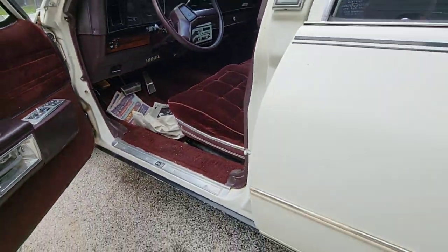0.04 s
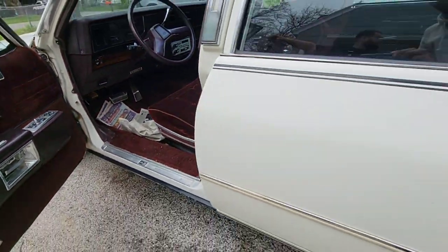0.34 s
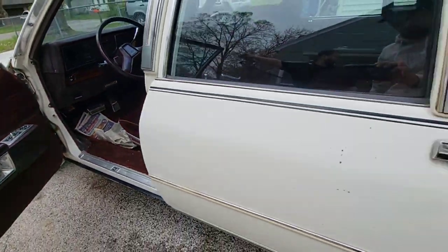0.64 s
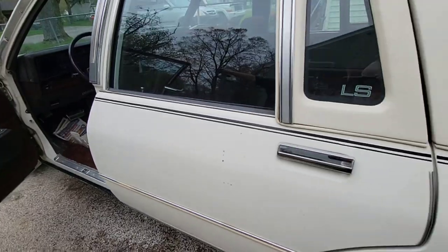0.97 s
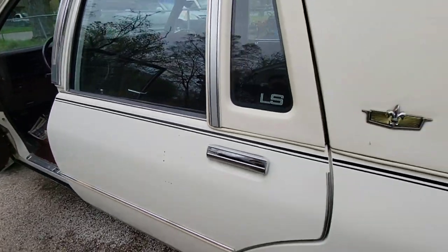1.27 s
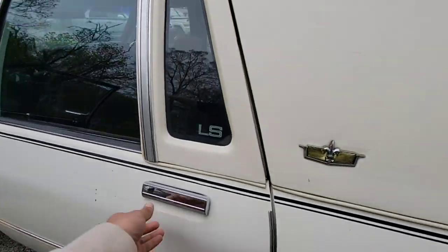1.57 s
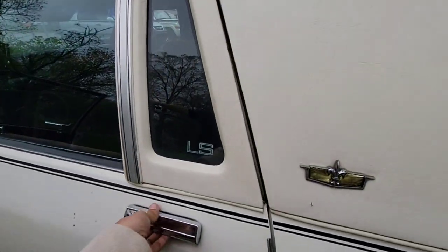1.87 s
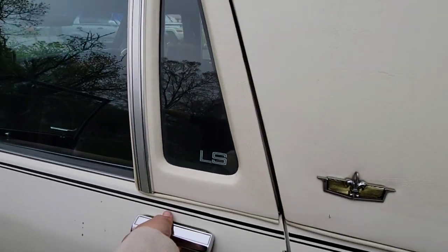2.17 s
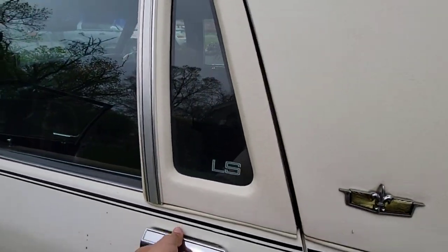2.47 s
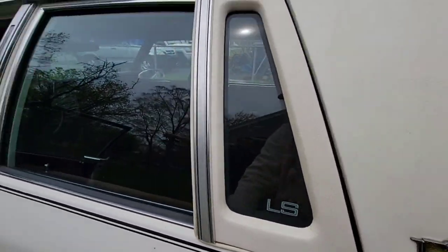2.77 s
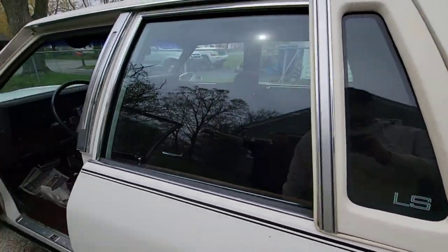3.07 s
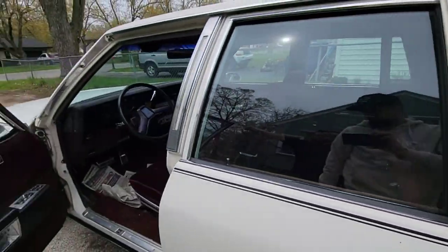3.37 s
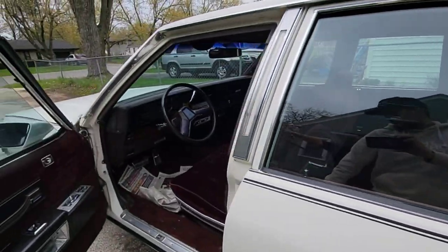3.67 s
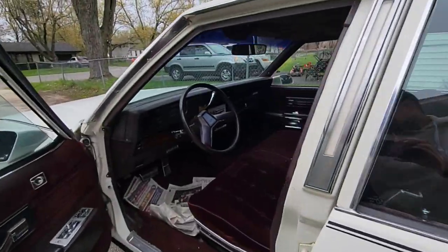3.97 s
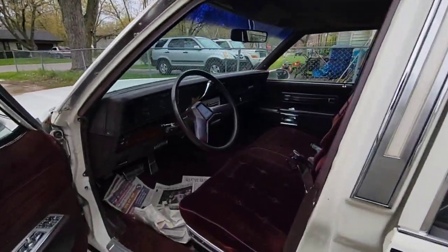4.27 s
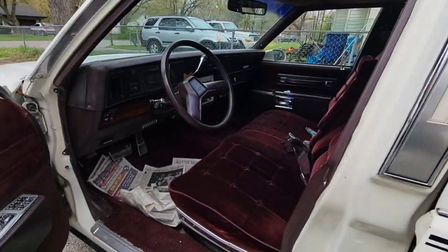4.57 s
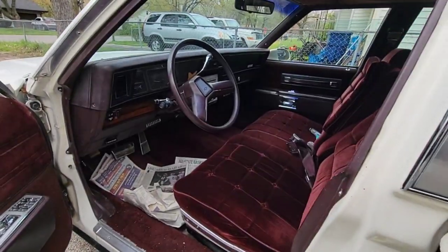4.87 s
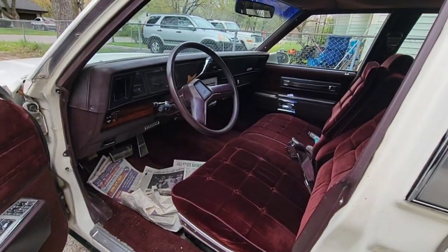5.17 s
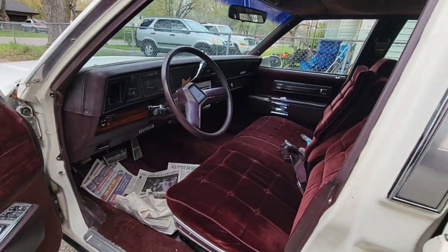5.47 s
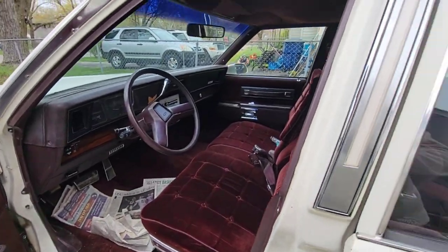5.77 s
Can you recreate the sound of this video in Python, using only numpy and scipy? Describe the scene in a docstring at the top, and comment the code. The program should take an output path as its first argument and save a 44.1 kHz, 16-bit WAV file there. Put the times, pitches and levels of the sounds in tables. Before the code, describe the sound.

Two large dogs bark outdoors, one near and one farther off, while a car door handle clacks over light wind rumble.

```python
"""Two large dogs in a yard; houses echo, light wind rumbles on the two ports of a hand-held microphone.
Thin whistles, then at 0.5 s the near dog's vocal folds break from a clean yip into a hoarse roar; the far
dog answers twice, gruffly. Someone steps along a parked car, pulls its rear door handle at 2 s and lets it
snap back at 2.7 s. The far dog barks twice more, the near one three times from 3.5 s and once at 5.2 s.
Whistles, steps and low bumps on the microphone end the scene."""
import sys
import numpy as np
from scipy import signal
from scipy.fft import rfft, irfft, next_fast_len
from scipy.io import wavfile
from scipy.ndimage import uniform_filter1d, minimum_filter1d, map_coordinates

SR = 44100
rng = np.random.default_rng(int(sys.argv[2]) if len(sys.argv) > 2 else 0)


def store_wav(level_fs):
    """Save 16-bit WAV to argv[1]."""
    pcm = np.round(np.clip(np.atleast_2d(level_fs), -1, 1) * 32767)
    wavfile.write(sys.argv[1], SR, pcm.T.astype(np.int16))


N = 265923

# neighbourhood hush: time_s, level_db
HUSH_LEVELS = [(0, -57.5), (2.4, -58), (3.5, -51), (4.7, -62), (6.03, -54)]
# wind puffs: peak_s, half_width_s, level_db
GUSTS = [(.1, 0.15, -37), (.64, 0.48, -42.5), (1.26, 0.1, -34.5), (3.73, .05, -41.5), (4.6, 0.56, -42.5),
         (5.48, 0.18, -34), (5.92, 0.27, -36.5)]
# microphone bumps: start_s, length_s, level_db, pitch_hz
BUMPS = [(5.368, 0.051, -28, 68.5), (5.467, 0.079, -25.5, 89), (5.842, 0.04, -24.5, 64.3),
         (5.865, 0.063, -34, 206)]
# thin whistles, probably birds: start_s, length_s, level_db, start_hz, middle_hz, end_hz, overtone_db
WHISTLES = [(0, 0.054, -58, 2800, 2895, 2830, -15), (0.057, 0.044, -46, 3000, 2997, 3000, -29),
            (0.081, 0.077, -58, 2930, 2970, 2880, -6.5), (0.282, 0.061, -80, 4900, 4150, 3560, -30),
            (4.927, .034, -65.5, 4640, 5210, 5250, -28), (5.43, 0.16, -60, 2860, 2930, 3040, -26),
            (5.577, 0.13, -67, 3040, 2960, 3000, -29), (5.691, 0.12, -55.5, 1148, 1105, 1140, -23)]
# sleeve swishes: peak_s, half_width_s, level_db
SWISHES = [(.05, 0.42, -56), (1.6, 0.23, -52.5), (2.12, .16, -51), (2.67, 0.083, -44), (3.24, 0.31, -49),
           (5.8, 0.054, -51), (6, 0.16, -57)]
# shoes on gritty paving: start_s, scuff_db, grit_db
STEPS = [(.135, -28.5, -56), (.837, -33, -49), (1.568, -23, -51), (1.706, -44, -59.5), (1.8253, -37, -44),
         (1.892, -41, -55.5), (3.14, -32.5, -49), (3.214, -38.5, -41.5), (3.9357, -36, -42.5),
         (4.4752, -36.5, -54), (4.819, -45.5, -52.5), (5.731, -38, -67), (5.8014, -59, -52.5),
         (5.8326, -35.5, -51)]
# hollow ring partials: freq_hz, gain_db
RING_PARTIALS = [(1055, -59.5), (1787, -61), (2492, -62), (2982, -67.5)]
# small metal contacts: start_s, level_db
JINGLES = [(0.9332, -49), (3.2745, -48.5), (3.3764, -54), (3.3917, -46.5)]
# their modes: freq_hz, gain_db, t60_s
JINGLE_MODES = [(10230, -2, 0.053), (12200, -7.5, .06), (14900, 2, .09), (15320, -1.5, .1)]
# pivot squeaks: start_s, length_s, level_db, centre_hz
SQUEAKS = [(2.007, 0.027, -53.5, 3870), (2.038, 0.047, -50, 6720)]
# handle linkage catches: start_s, thud_db, clack_db, snap_db, t60_s
CATCHES = [(1.937, -38, -37, -43.5, 0.18), (1.964, -43.5, -23.5, -27, 0.071), (2.033, -43, -47, -62, 0.54),
           (2.101, -38, -28.5, -45, 0.081), (2.599, -45.5, -44.5, -54, 0.73),
           (2.63, -42.5, -53.5, -48.5, 1), (2.679, -38, -17, -19.5, 0.08), (2.751, -34, -32, -57, 0.21),
           (2.765, -67, -38.5, -54, .1)]
# modes of door skin, steel latch, open car cabin: freq_hz, width_hz, gain_db
PANEL_MODES = [(206, 120, -12.5), (325, 49, 1), (369, 44, 1), (596, 110, -7.5)]
LATCH_MODES = [(1270, 43, 14), (1795, 62, 5), (2470, 32, -1), (3590, 64, 5.5)]
CABIN_MODES = [(400, 7.6, -24.5), (485, 21, 13.5), (770, 16, -12), (930, 75, 4.5), (1160, 6.1, 8),
               (1370, 14, 6.5), (2770, 120, 6)]
# barks: start_s, length_s, level_db, top_pitch_hz, crest_share, throat_scale, muzzle_hz, gape_db, woof_db
FAR_BARKS = [(.935, 0.19, -25, 427.7, 0.44, 1.07, 1900, 0, -15),
             (1.255, 0.21, -25.5, 387, 0.51, 1.1, 1050, -5, 0.5),
             (2.815, .18, -24.5, 421.4, .5, 1.15, 1250, -3.5, -9.5),
             (3.2, .165, -25.5, 409.5, 0.53, .99, 1250, 3, -9)]
NEAR_BARKS = [(.479, 0.091, -7, 499.6, 0.74, 0.99, 1798, -2.5, 1),
              (3.536, 0.073, -8, 451.2, .6, 1.013, 1760, -3.5, -2),
              (3.764, .088, -8.5, 422.6, 0.37, 1.036, 1220, -4.5, -6),
              (4.062, .08, -11, 489.4, .68, .96, 1295, -1, -1),
              (5.230, 0.093, -10.5, 419.3, 0.34, 1.01, 1274, 0.5, -1)]
# throat and muzzle resonances: freq_hz, gain_db
FAR_THROAT = [(200, -37), (340, -0.5), (450, 7), (600, -1.5), (760, 6.5), (1000, -4.5), (1260, 2),
              (1550, -26), (1950, -7.5), (2600, -47.5), (4200, -61.5), (5700, -63.5), (9000, -72.5)]
NEAR_THROAT = [(210, -75.5), (350, -5), (490, -0.5), (640, -7), (830, 6.5), (1050, -6), (1320, -7),
               (1760, -10), (2400, -28.5), (2950, -32.5), (4000, -44), (5400, -32.5), (7200, -45.5),
               (9000, -65)]
# yips, led by harmonic 3: start_s, length_s, lead_db, peak_db, start_hz, end_hz, others_db
YIPS = [(0.45, 0.039, -28, -18, 1262, 1415, -14), (3.484, 0.053, -24.5, -4, 1394, 1491, -16),
        (3.737, 0.039, -22.5, -11, 1294, 1535, -22.5), (4.026, .052, -21.5, -7, 1305, 1350, -23.5),
        (5.202, 0.033, -14, -33.5, 1466, 1410, -15.5)]
# other yip harmonics: number, gain_db
YIP_HARMONICS = [(1, -30.5), (2, -15), (4, -25), (5, -25), (6, -28.5), (7, -37.5)]
# noise spectra: freq_hz, gain_db
RUMBLE = [(12, -44.5), (20, -11), (54, -5), (75, -0.5), (98, -7.5), (124, -13.5), (274, -29), (300, -52.5),
          (390, -59.5), (660, -120)]
HUSH = [(88, -42.5), (150, -3.5), (182, -7), (366, -5), (428, -17.5), (500, -7.5), (572, -20.5), (812, -11),
        (1170, -24), (1320, -57.5), (2500, -25), (5130, -44), (15500, -53)]
CLACK = [(300, -9.5), (900, 2), (1400, 3.5), (2600, -5), (4500, -19.5), (9000, -59)]
SNAP = [(1500, -38), (3800, 4.5), (7000, -0.5), (9000, -6), (15000, -31.5)]
CLOTH = [(200, 2.5), (700, 3.5), (1800, 1.5), (3000, -9.5), (4500, -13.5), (7000, -20.5), (9000, -33),
         (15000, -26)]
TEETH_HISS = [(1800, -13), (2900, 2), (4000, -11), (5400, 3), (7200, -.5), (9000, -20.5), (15000, -20)]
YIP_AIR = [(600, -30.5), (1000, 7.5), (1500, -.5), (2500, -4.5), (4000, -29.5), (5600, -6), (9000, -37.5)]
# decay off close walls and farther houses: freq_hz, t60_s
WALL_DECAY = [(200, 0.22), (800, 0.35), (2000, 0.18), (6000, 0.24), (14000, 0.14)]
STREET_DECAY = [(200, 2.1), (450, 0.34), (820, 1.44), (1500, 0.98), (5000, 2), (12000, 0.73)]
# port phase for sound from the side: freq_hz, left_lead_rad
PORT_PHASE = [(100, 0), (420, -1.8), (850, -3.0), (1400, -3.4), (2600, -3.0), (6000, -4.4)]
# dogs' direction as the microphone turns: time_s, phase_scale
BEARING = [(0, 1.02), (3.2, 1.02), (3.5, 1.12), (3.75, 1.02), (4.05, .82), (5.2, .77)]
# reflections off the car: freq_hz, random_phase_rad
SCATTER = [(900, 0.029), (1700, 1.5), (2600, 3.3), (5000, 3.4)]


def amp(db):
    """Decibels to gain."""
    return 10 ** (np.asarray(db) / 20)


def unit(x):
    """Scale to rms 1."""
    return x / np.sqrt(np.mean(x ** 2) + 1e-20)


def along(points, hz):
    """(freq_hz, value) points read on a log axis."""
    freqs_hz, values = np.transpose(points)
    return np.interp(np.log(hz + 1), np.log(freqs_hz), values)


def clock(length_s):
    """Sample times in seconds."""
    return np.arange(int(length_s * SR)) / SR


def phase_of(pitch_hz):
    """Running phase in radians."""
    return 2 * np.pi * np.cumsum(pitch_hz) / SR


def wobble(knots_per_s, size):
    """Smooth random curve."""
    return map_coordinates(rng.standard_normal(4096), [np.arange(size) * knots_per_s / SR], mode="wrap")


def swells(rows, rest_db):
    """Resting gain plus one bell per row."""
    t = np.arange(N) / SR
    power = sum(amp(db) ** 2 * np.exp(-2 * ((t - peak_s) / width_s) ** 2) for peak_s, width_s, db in rows)
    return np.sqrt(amp(rest_db) ** 2 + power)


def filtered(x, response):
    """Apply a complex frequency response."""
    size = x.shape[-1]
    padded = next_fast_len(size + 8192)
    return irfft(rfft(x, padded) * response(np.fft.rfftfreq(padded, 1 / SR)), padded)[..., :size]


def coloured(x, spectrum, freq_scale=1):
    """Shape by a spectrum, at rms 1."""
    return unit(filtered(x, lambda hz: amp(along(spectrum, hz / freq_scale))))


def resonate(x, modes):
    """Parallel resonators of alternating sign."""
    return filtered(x, lambda f: sum(
        (-1) ** k * amp(db) * 1j * f * width_hz / (hz * hz - f * f + 1j * f * width_hz)
        for k, (hz, width_hz, db) in enumerate(modes)))


def noise_pair(correlation, size):
    """White stereo noise."""
    mid, side = rng.standard_normal((2, size))
    turn_rad = np.arccos(correlation) / 2
    return np.cos(turn_rad) * mid + np.sin(turn_rad) * np.array([side, -side])


def add(track, start_s, x):
    """Mix x into the track."""
    part = track[:, round(start_s * SR):][:, :x.shape[-1]]
    part += x[..., :part.shape[1]]


def wind_and_hush():
    """Wind and handling rumble on the ports over the neighbourhood's hush."""
    flutter = amp(1.5 * wobble(12, N))
    wind = swells(GUSTS, rest_db=-47.5) * flutter * coloured(noise_pair(.3, N), RUMBLE)
    hush_db = np.interp(np.arange(N) / SR, *np.transpose(HUSH_LEVELS)) + wobble(4.8, N)
    track = wind + amp(hush_db) * coloured(noise_pair(0, N), HUSH)
    for start_s, length_s, db, hz in BUMPS:
        t = clock(length_s)
        bump = np.sin(phase_of(hz * (1 + .32 * wobble(90, len(t)))))
        add(track, start_s, amp(db) * np.sin(np.pi * t / length_s) * bump)
    return track


def echo(x, decay, build_s):
    """Diffuse reflections; each frequency dies at its own rate."""
    hz, t, spectra = signal.stft(noise_pair(.63, SR), SR, nperseg=256)
    tail = signal.istft(spectra * amp(-60 * t / along(decay, hz)[:, None]), SR, nperseg=256)[1]
    tail *= 1 - np.exp(-(np.arange(tail.shape[1]) / SR / build_s) ** 2)
    return signal.fftconvolve(x, tail / np.linalg.norm(tail[0]), axes=1)[:, :N]


def whistles():
    """Nearly pure tones on curved glides."""
    track = np.zeros((2, N))
    for start_s, length_s, db, start_hz, middle_hz, end_hz, overtone_db in WHISTLES:
        progress = clock(length_s) / length_s
        glide_hz = np.polyval(np.polyfit([0, .5, 1], [start_hz, middle_hz, end_hz], 2), progress)
        phase = phase_of(glide_hz * (1 + .00098 * wobble(90, len(progress))))
        swell = np.sqrt(np.sin(np.pi * progress)) * amp(db + 2 * wobble(45, len(progress)))
        add(track, start_s, swell * (np.sin(phase) + amp(overtone_db) * np.sin(2 * phase)))
    return track


def clothes():
    """Cloth brushes faintly and swishes with each movement."""
    cloth = coloured(noise_pair(.027, N), CLOTH)
    flicker = amp(2.5 * wobble(40, N))
    return swells(SWISHES, rest_db=-60.5) * flicker * cloth


def steps(rise_s=.0027, grains_per_s=5):
    """Soles scuff and crack grit; stray grains tick in between."""
    track, t = np.zeros((2, N)), clock(1 / 6)
    press = lambda t60_s: (1 - np.exp(-t / rise_s)) * amp(-60 * t / t60_s + .65 * wobble(270, len(t)))
    for start_s, scuff_db, grit_db in STEPS:
        scuff = amp(scuff_db) * coloured(noise_pair(.12, len(t)), CLACK)
        grit = amp(grit_db) * coloured(noise_pair(.1, len(t)), SNAP)
        add(track, start_s, press(t60_s=.036) * (scuff + grit))
    grains = (rng.random(N) < grains_per_s / SR) * amp(-55 + 4.5 * rng.uniform(-1, 1, N))
    ticks = signal.fftconvolve(grains, press(t60_s=.02))[:N]
    return track + ticks * coloured(noise_pair(.16, N), SNAP)


def hollow_ring(start_s=1.49, rise_s=.09, t60_s=.6):
    """Faint wavering partials swell and die as the hand reaches for the door."""
    track, t = np.zeros((2, N)), clock(.74)
    partial = lambda hz: np.sin(2 * np.pi * hz * t + 2.6 * wobble(70.9, len(t)))
    ring = np.array([sum(amp(db) * partial(hz) for hz, db in RING_PARTIALS) for side in "LR"])
    add(track, start_s, (1 - np.exp(-t / rise_s)) * amp(-37 - 60 * t / t60_s) * unit(ring))
    return track


def jingles(rise_s=.0052, snap_db=.5, snap_t60_s=.017):
    """Small metal pieces touch with a snap and ring high."""
    track, t = np.zeros((2, N)), clock(1 / 6)
    for start_s, db in JINGLES:
        snap = coloured(noise_pair(0, len(t)), SNAP)
        add(track, start_s, amp(db + snap_db - 60 * t / snap_t60_s) * snap)
        for hz, mode_db, t60_s in JINGLE_MODES:
            phase = 2 * np.pi * hz * t + .91 * wobble(300, len(t))
            decay = amp(db + mode_db + rng.normal(0, 2.5, (2, 1)) - 60 * t / t60_s)
            add(track, start_s, decay * (1 - np.exp(-t / rise_s)) * np.sin(phase))
    return track


def pivot_squeaks(half_width_hz=160):
    """The handle's dry pivot rubs steel on steel in a narrow, rough band."""
    track = np.zeros((2, N))
    for start_s, length_s, db, centre_hz in SQUEAKS:
        t = clock(length_s)
        band = lambda hz: np.exp(-((hz - centre_hz) / half_width_hz) ** 2)
        rub = unit(filtered(noise_pair(.35, len(t)), band))
        add(track, start_s, amp(db) * np.sin(np.pi * t / length_s) * rub)
    return track


def door_handle(rise_s=.003, thud_cutoff_hz=1500):
    """Each catch of the linkage clacks, rings the latch and thuds through the hollow door."""
    track, t = np.zeros((2, N)), clock(1 / 4)
    blow = lambda t60_s: (1 - np.exp(-t / rise_s)) * amp(-60 * t / t60_s)
    contact = amp(-6.5) * unit(signal.unit_impulse(len(t)))
    for start_s, thud_db, clack_db, snap_db, t60_s in CATCHES:
        rattle = unit(noise_pair(.65, len(t)) * blow(t60_s))
        panel = resonate(contact + rattle, PANEL_MODES)
        thud = unit(filtered(panel, lambda hz: 1 / (1 + (hz / thud_cutoff_hz) ** 4)))
        clack = coloured(noise_pair(.047, len(t)), CLACK) * blow(.7 * t60_s)
        latch = unit(resonate(coloured(noise_pair(.3, len(t)), CLACK), LATCH_MODES))
        clack += amp(-12) * latch * blow(t60_s)
        snap = coloured(noise_pair(0, len(t)), SNAP) * blow(.17 * t60_s)
        add(track, start_s, amp(thud_db) * thud + amp(clack_db) * clack + amp(snap_db) * snap)
    return track


def ports(x, time_s, delay_s=.0005, shadow_hz=1900):
    """Side sound meets the two ports out of phase; its treble is scattered and late on the left."""
    bearing = np.interp(time_s, *np.transpose(BEARING))

    def response(hz):
        ripple = map_coordinates(rng.standard_normal(256), [hz / 150], mode="wrap")
        lag_rad = 2 * np.pi * delay_s * np.maximum(hz - shadow_hz, 0)
        lead_rad = bearing * along(PORT_PHASE, hz) + along(SCATTER, hz) * ripple - lag_rad
        return np.exp(.5j * lead_rad * np.array([[1], [-1]]))
    return filtered(x, response)


def vocal_folds(pitch_hz, jitter, shimmer_db, air_share):
    """Chaotic folds: uneven pulses plus air noise that swells once a cycle."""
    size = len(pitch_hz)
    cycles = np.cumsum(pitch_hz * (1 + jitter * wobble(260, size))) / SR
    pulses = np.diff(np.floor(cycles), prepend=0) * amp(shimmer_db * wobble(329.1, size))
    air = rng.standard_normal(size) * (1 + .24 * np.cos(2 * np.pi * cycles))
    return np.sqrt(1 - air_share) * unit(pulses) + np.sqrt(air_share) * unit(air)


def yips(attack_s=.01, swell_s=.025, release_s=.007):
    """One clean note before the chaos; harmonic 3 glides into the muzzle's resonance and swells."""
    track, t = np.zeros((2, N)), clock(1 / 10)
    for start_s, length_s, lead_db, peak_db, start_hz, end_hz, others_db in YIPS:
        progress = np.clip((t - length_s) / swell_s + 1, 0, 1)
        third_hz = start_hz + (end_hz - start_hz) * np.sin(np.pi * np.minimum(progress, .5)) ** 2
        phase = phase_of(third_hz * (1 + .008 * wobble(300, len(t))))
        held = np.clip(t / attack_s, 0, 1) * np.clip((length_s - t) / release_s, 0, 1)
        swell = amp(lead_db) * held + amp(peak_db) * np.abs(np.sin(np.pi * progress)) ** 3.9
        air = amp(-22) * coloured(rng.standard_normal(len(t)), YIP_AIR)
        others = sum(amp(db) * np.sin(k * phase / 3) for k, db in YIP_HARMONICS)
        yip = np.sqrt(2) * swell * np.sin(phase) + amp(others_db) * held * (others + air)
        add(track, start_s, ports(yip, start_s))
    return track


def barks(rows, throat, jitter, shimmer_db, air_share, rise_s, release_s, pitch_sag,
          closing_scale, dulling_db, swell_db, muzzle_db, muzzle_octaves=.28):
    """Pitch and level arch with the push of air; resonances sink and tilt as the jaws close."""
    track, t = np.zeros((2, N)), clock(1 / 3)
    throat_hz, throat_db = np.transpose(throat)
    upper = np.clip(np.log2(throat_hz / 750), 0, 1)  # resonances a wide mouth lets out
    mouth = lambda gape_db: np.transpose([throat_hz, throat_db + gape_db * upper])
    for start_s, length_s, db, top_hz, crest, throat_scale, muzzle_hz, gape_db, woof_db in rows:
        progress = t / length_s
        off_crest = np.minimum((progress - crest) ** 2, 1)
        pitch_hz = top_hz * (1 - pitch_sag * off_crest)
        muzzle = lambda hz: amp(muzzle_db * np.exp(-(np.log2((hz + 1) / muzzle_hz) / muzzle_octaves) ** 2))
        source = filtered(vocal_folds(pitch_hz, jitter, shimmer_db, air_share), muzzle)
        wide = coloured(source, mouth(gape_db + dulling_db), throat_scale)
        narrow = coloured(source, mouth(gape_db - dulling_db), throat_scale * closing_scale)
        shut = np.clip(progress, 0, 1)
        voice = (1 - shut) * wide + shut * narrow
        voice /= np.sqrt(np.mean(voice[progress < 1] ** 2))
        # turbulence between the teeth, only at full push
        voice += amp(-38 - 58 * off_crest) * coloured(source, TEETH_HISS)
        # mid-bark the folds lock onto the lowest resonance: a round fundamental
        woof = np.sin(phase_of(pitch_hz * (1 + .029 * wobble(116.1, len(t)))))
        voice += amp(woof_db - 21 * off_crest + 3 * wobble(120, len(t))) * woof
        attack = (1 - np.exp(-t / rise_s)) ** 2
        release = 1 / (1 + np.exp(np.minimum((t - length_s) / release_s, 50)))
        add(track, start_s, ports(amp(db - swell_db * off_crest) * attack * release * voice, start_s))
    return track


def scene():
    """Dogs to one side, the car close by, echoes around both."""
    near = yips() + barks(NEAR_BARKS, NEAR_THROAT, jitter=.035, shimmer_db=9, air_share=.41,
                          rise_s=.0022, release_s=.0023, pitch_sag=.45, closing_scale=.99,
                          dulling_db=7, swell_db=1.5, muzzle_db=7.5)
    far = barks(FAR_BARKS, FAR_THROAT, jitter=.06, shimmer_db=6, air_share=.57,
                rise_s=.0089, release_s=.031, pitch_sag=.25, closing_scale=.88,
                dulling_db=-2.5, swell_db=12, muzzle_db=.5)
    close = door_handle() + pivot_squeaks() + steps() + clothes() + jingles() + hollow_ring()
    cabin = amp(-20) * resonate(near + far, CABIN_MODES)
    walls = echo(amp(-8.5) * near + amp(-9) * far + amp(-13.5) * close, WALL_DECAY, build_s=.0072)
    street_send = amp(-25) * near + amp(-11.5) * far + amp(-9.5) * cabin + amp(-34) * close
    street = echo(street_send, STREET_DECAY, build_s=.02)
    balance = amp([[-1], [1]])
    return (near + far + close + cabin + walls + street + whistles()) * balance + wind_and_hush()


def record(dry, top_hz=15800):
    """Peak limiter at full scale, then a steep low-pass."""
    needed = 1 / np.maximum(np.abs(dry).max(axis=0), 1)
    held = minimum_filter1d(needed, size=265)
    gain = uniform_filter1d(uniform_filter1d(held, size=133), size=133)
    return filtered(dry * gain, lambda hz: hz < top_hz)


dry = scene()
out = record(dry)
store_wav(out)
```